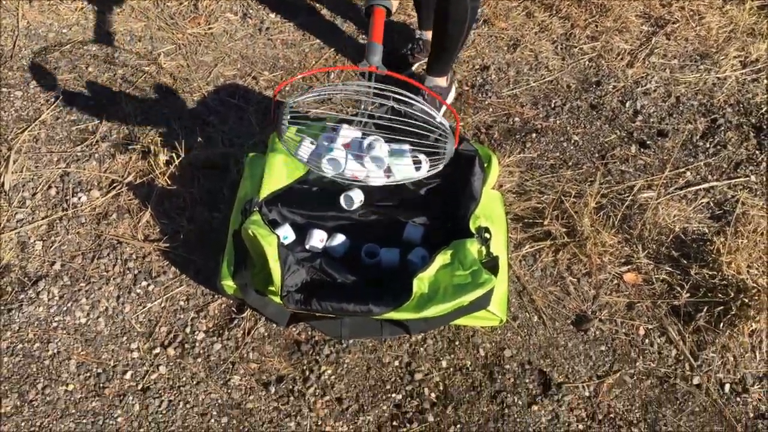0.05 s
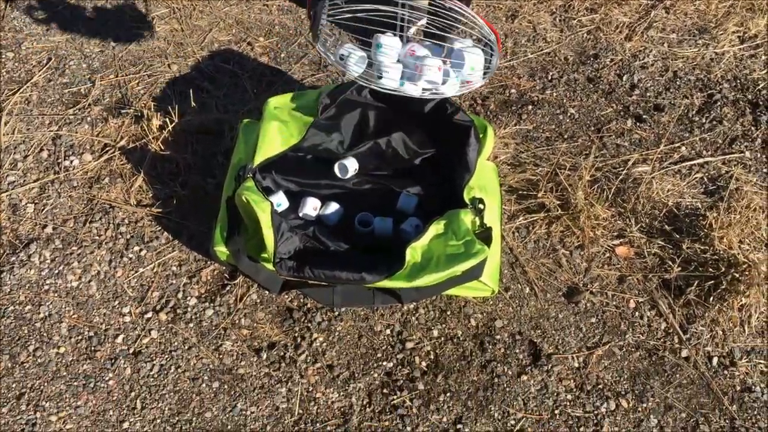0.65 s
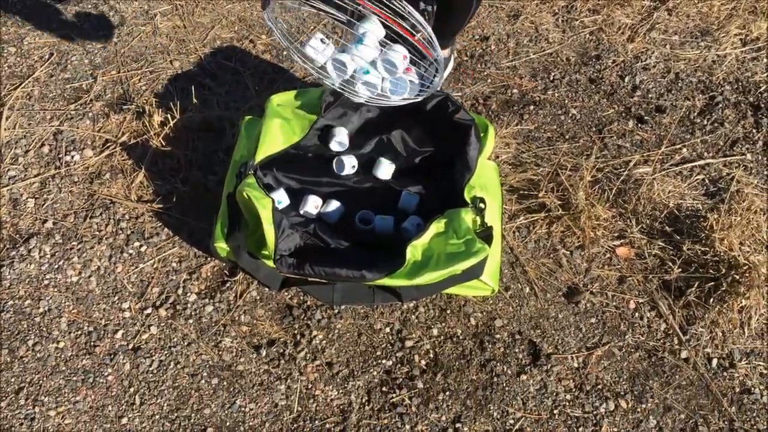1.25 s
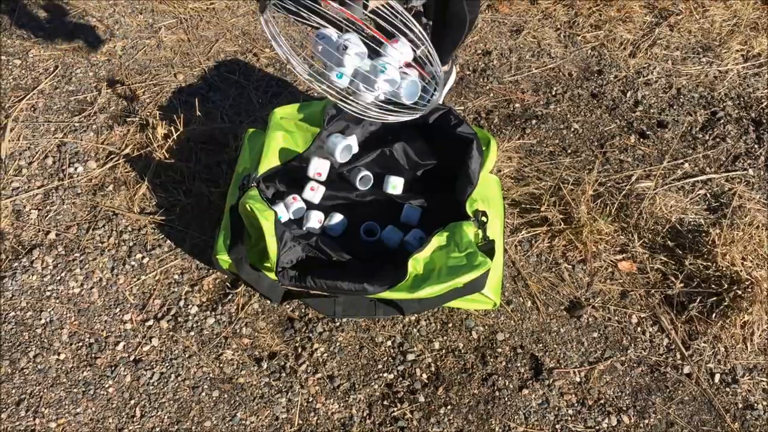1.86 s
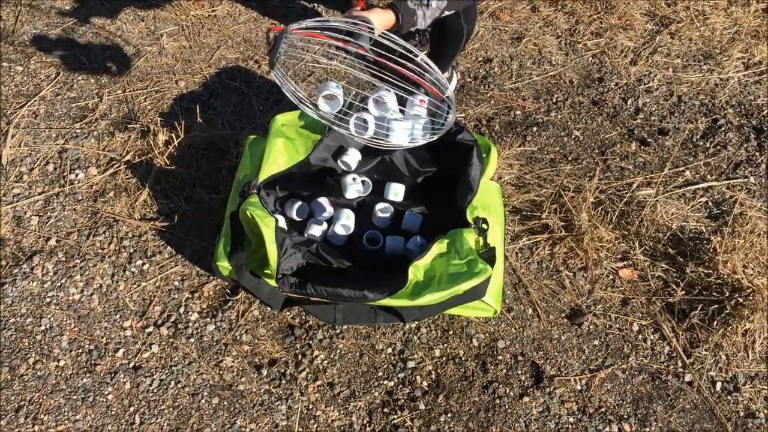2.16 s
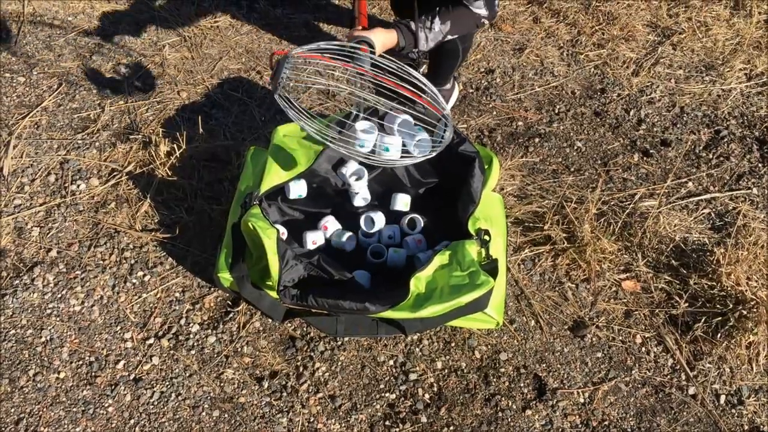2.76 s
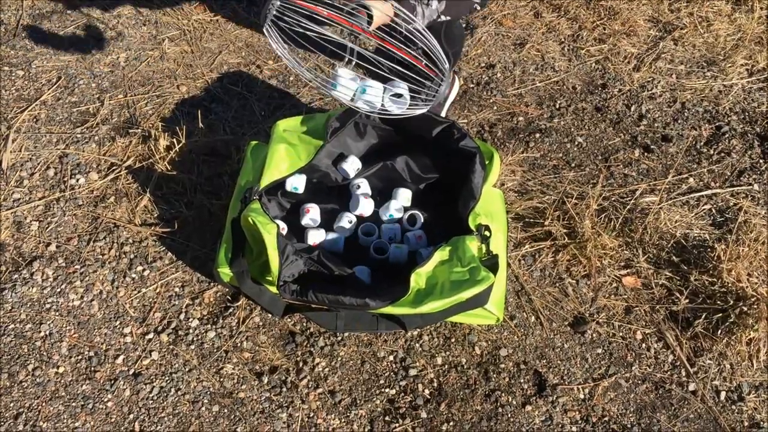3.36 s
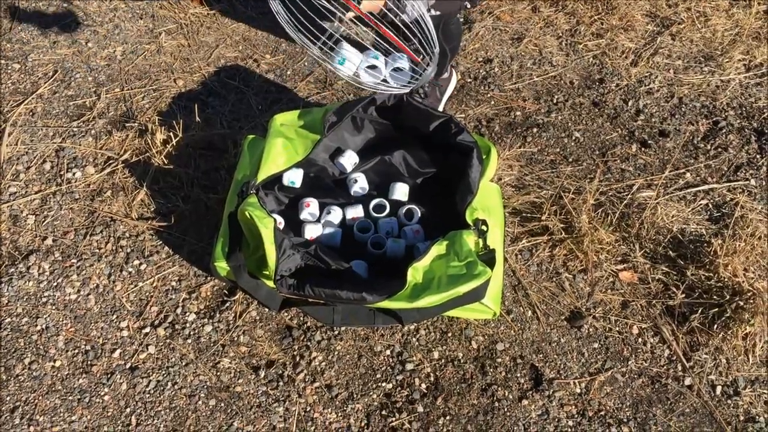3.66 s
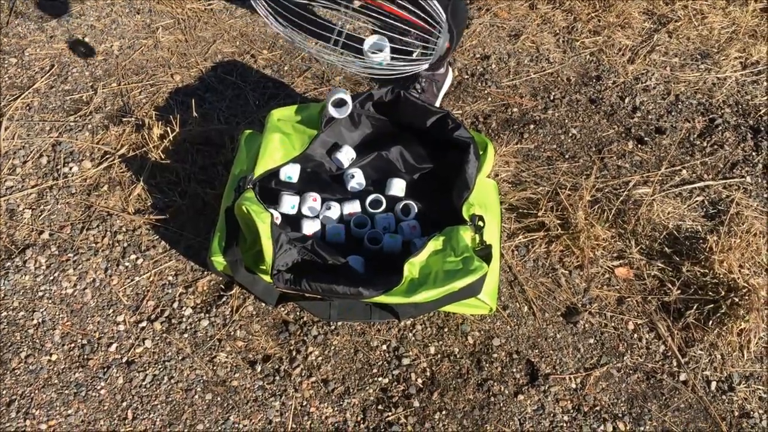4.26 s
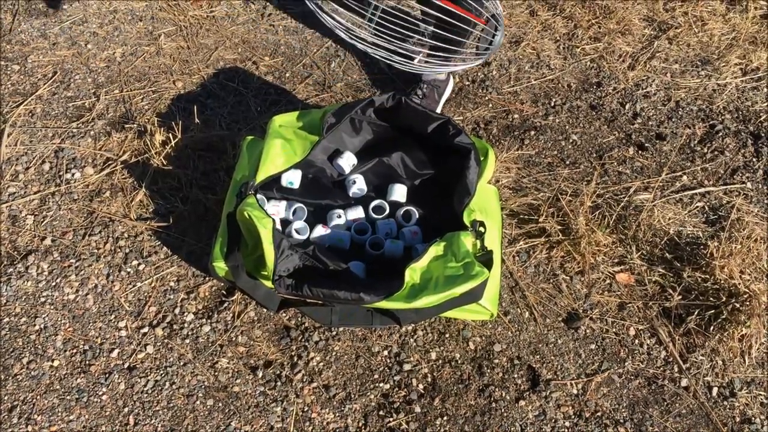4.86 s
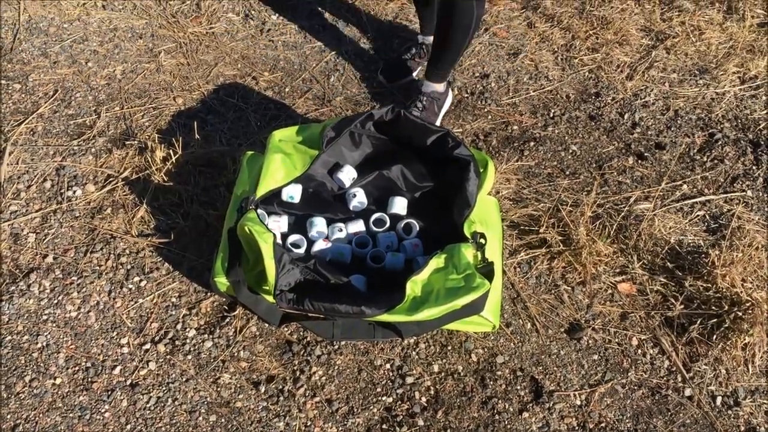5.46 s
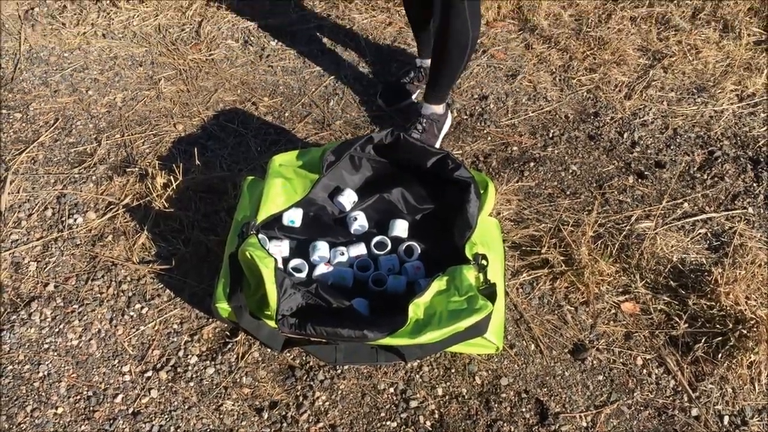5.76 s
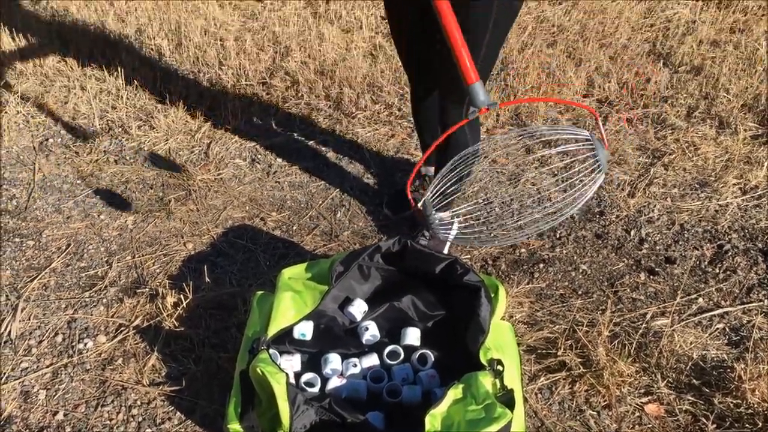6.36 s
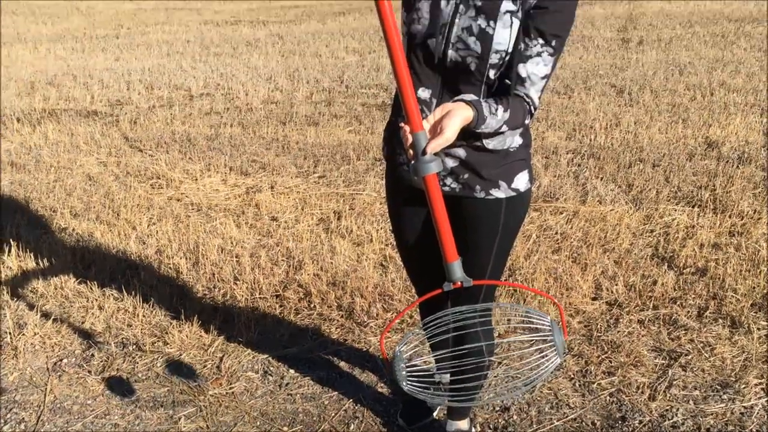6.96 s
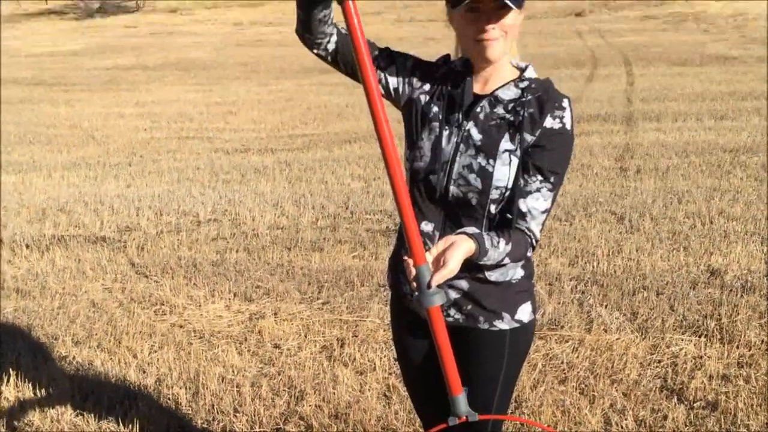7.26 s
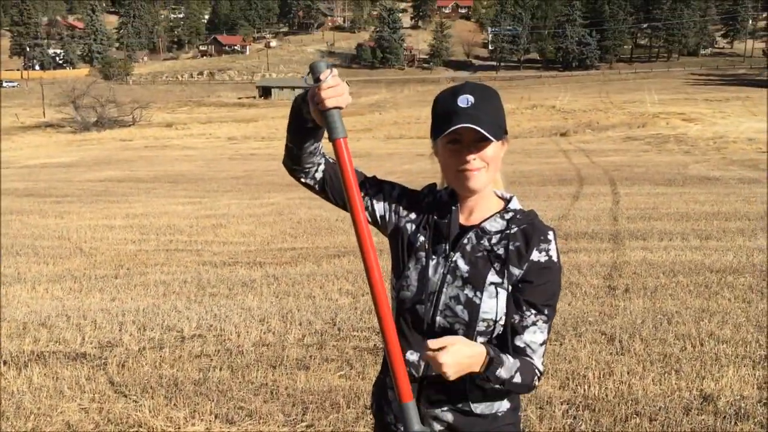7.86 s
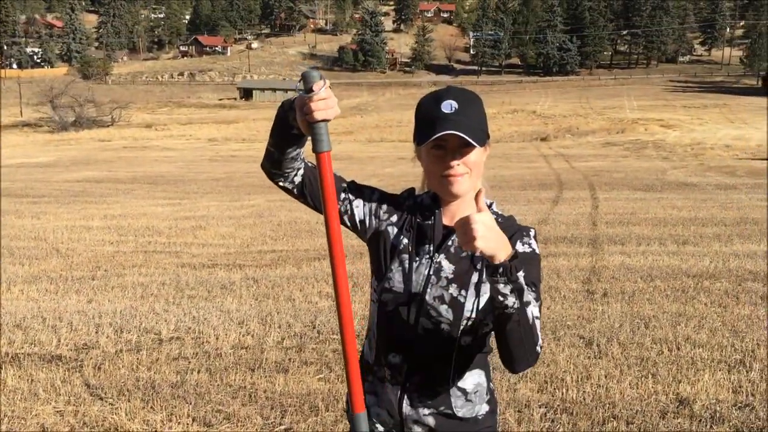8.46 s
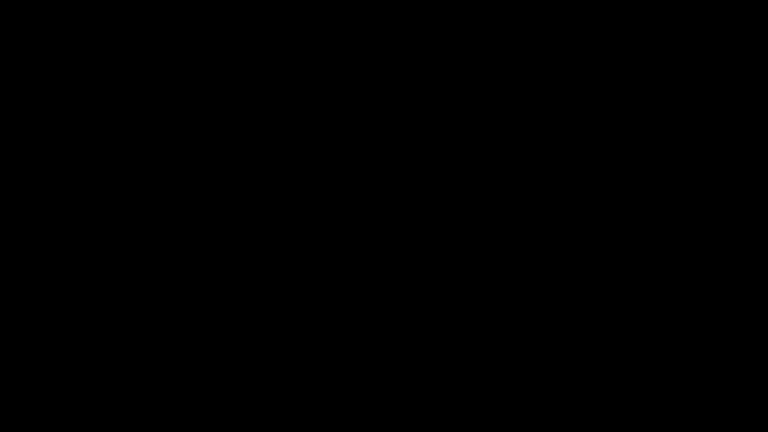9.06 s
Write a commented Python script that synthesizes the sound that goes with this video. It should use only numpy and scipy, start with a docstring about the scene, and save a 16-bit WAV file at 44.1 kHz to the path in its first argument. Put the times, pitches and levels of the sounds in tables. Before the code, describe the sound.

Hollow plastic balls tick and scrape against a wire basket while a faint engine drones far away. They then tumble into a nylon bag in irregular clusters of sharp cracks, hollow clacks and soft thuds. The drone fades, and the heap settles with a brief hiss of cloth. Afterwards shoes and sleeves rustle softly and wind buffets the microphone. The place is an open field without echo.

```python
"""Hollow plastic balls are shaken from a rolling wire basket into a nylon bag, in a field without echo.
At first, over a distant engine's drone, the balls tick and scrape on the wires. From 1.1 s they drop
on the heap: each impact excites damped modes of shell, heap and bag, heard as a crack, a hollow clack
and a thud. The drone fades by 4 s, and near 4.8 s the heap settles with a hiss of friction on cloth.
Then shoes and sleeves rustle, a far hush swells, and turbulent air buffets the microphone until 9 s."""
import sys
import numpy as np
from scipy import signal
from scipy.fft import rfft, irfft, next_fast_len
from scipy.io import wavfile
from scipy.ndimage import uniform_filter1d

SR = 44100
rng = np.random.default_rng(int(sys.argv[2]) if len(sys.argv) > 2 else 0)


def wav_out(sig):
    """Save sig, one row per channel (or a flat mono array), as 16-bit PCM at SR to the path in sys.argv[1]."""
    wavfile.write(sys.argv[1], SR, np.round(np.clip(np.atleast_2d(sig).T, -1, 1) * 32767).astype(np.int16))


N = 401751
HIT = 6615  # samples in one impact, 0.15 s
TIME = np.arange(N) / SR
AGE = TIME[:HIT]


def amp(db):
    """Amplitude ratio of a level in decibels."""
    return 10 ** (np.asarray(db) / 20)


def unit(x):
    """Normalisation to rms 1."""
    return x / np.sqrt(np.mean(x ** 2))


def unit_energy(x):
    """Normalisation to the energy of 10 ms at rms 1."""
    return x / np.sqrt(np.sum(x ** 2) / 441)


def curve(rows):
    """Gain interpolated from rows of t/s, level/dB."""
    return amp(np.interp(TIME, *np.transpose(rows)))


def add(out, s, x):
    """Superposition of a short sound at time s."""
    i = max(int(s * SR), 0)
    out[i:i + len(x)] += x[:max(N - i, 0)]


def swell(start, length, attack, release):
    """Envelope: quadratic rise until the start, a plateau, then exponential decay; times in s."""
    rise = np.clip(1 + (TIME - start) / attack, 0, 1) ** 2
    return rise * np.exp(-np.maximum(TIME - start - length, 0) / release)


def aftermath(blows, t60, delay=0):
    """Energy addition: blows (t/s, level/dB) feed a motion that decays exponentially."""
    energy = np.zeros(N)
    for s, db in blows:
        add(energy, s + delay, amp([db]) ** 2)
    retained = np.exp(-2 * np.log(1000) / (t60 * SR))
    return np.sqrt(signal.lfilter([1], [1, -retained], energy + 1e-24))


def walk(rate):
    """Smooth random modulation of rms 1, with `rate` steps a second."""
    k = int(SR / rate)
    steps = np.repeat(rng.standard_normal(N // k + 1), k)
    return unit(uniform_filter1d(uniform_filter1d(steps, k), k)[:N])


def grains(rate, spread_db):
    """Poisson process of tiny impacts of unequal size."""
    size = amp(spread_db * np.minimum(rng.exponential(size=N), 4))
    return (rng.random(N) < rate / SR) * size * rng.choice([-1, 1], N)


def contact(t60, rise=.0002):
    """Force of a chattering contact: an exponentially decaying noise burst."""
    return rng.standard_normal(HIT) * amp(-60 * AGE / t60) * (1 - np.exp(-AGE / rise))


def bandpass(x, low_hz, high_hz, order=3):
    """Butterworth band limit."""
    return signal.sosfilt(signal.butter(order, [low_hz, high_hz], "band", fs=SR, output="sos"), x)


def colour(x, spectrum, bright_db=0):
    """Minimum-phase filter with the given spectrum; brightness is a shelf above 7 kHz."""
    size = next_fast_len(len(x) + 2048, True)
    size += size % 2
    f = np.maximum(np.fft.rfftfreq(size, 1 / SR), 1)
    hz, db = np.transpose(spectrum)
    shelf = 1 / (1 + (7000 / f) ** 4)
    rolloff_db = 24 * np.clip(np.log2(f / hz[0]), -2, 0)
    gain = amp(np.interp(np.log(f), np.log(hz), db) + rolloff_db + bright_db * shelf)
    cepstrum = irfft(np.log(gain))
    cepstrum[1:size // 2] *= 2  # folding the cepstrum makes the filter causal
    cepstrum[size // 2 + 1:] = 0
    return irfft(rfft(x, size) * np.exp(rfft(cepstrum)))[:len(x)]


def patchy(spectrum, spread_db):
    """Random spectral ripple: each contact point favours its own resonances."""
    hz, db = np.transpose(spectrum)
    fine_hz = np.geomspace(hz[0], hz[-1], 30)
    ripple_db = spread_db * rng.standard_normal(len(fine_hz))
    return np.column_stack([fine_hz, np.interp(np.log(fine_hz), np.log(hz), db) + ripple_db])


def resonate(x, modes, pitch=1, scatter_db=0):
    """Modal superposition: each contact point weights the parallel resonances differently."""
    out = 0
    for (hz, width, db), chance in zip(modes, rng.standard_normal(len(modes))):
        centre = min(hz * pitch, SR * .45)
        b, a = signal.iirpeak(centre, max(centre / width, .5), SR)
        out = out + amp(db + scatter_db * chance) * unit(signal.lfilter(b, a, x))
    return out


# open-air spectrum: f/Hz, level/dB
FIELD = [(30, -26), (65, 4), (130, 2), (200, 0.5), (330, -5.5), (500, -5), (700, -1), (1000, -3.5),
         (1400, -11), (2200, -16.5), (6900, -22.5), (16000, -31)]


def open_air():
    """Ambient noise floor, strongest in the bass, with a slight level modulation."""
    return unit(colour(rng.standard_normal(N), FIELD)) * amp(-63 + .6 * walk(2.7))


# spectrum of the hush: f/Hz, level/dB
HUSH_SPECTRUM = [(400, -20.5), (600, 1.5), (720, 4), (900, -3), (1150, -9.5), (1600, -20), (3000, -36)]
# its envelope: t/s, level/dB
HUSH_LEVEL = [(5.62, -74.5), (5.78, -65.5), (5.9, -78), (6.8, -66.5), (7.02, -63), (7.28, -71.5),
              (7.45, -64.5), (7.85, -66.5), (8.11, -63.5), (8.31, -66.5), (8.47, -62), (8.7, -69.5),
              (8.88, -61.5)]


def far_hush():
    """Slow amplitude modulation makes a band of midrange noise swell and sink."""
    return unit(colour(rng.standard_normal(N), HUSH_SPECTRUM)) * curve(HUSH_LEVEL)


# spectrum of the engine's noise: f/Hz, level/dB
DRONE_SPECTRUM = [(30, -34), (80, -15), (118, 0), (190, -5), (330, -26.5), (440, -27), (560, -9),
                  (690, -8.5), (830, -17), (1100, -13.5), (1500, -28.5), (2400, -30), (4000, -59.5)]
# its envelope: t/s, level/dB
DRONE_LEVEL = [(0, -49.5), (1.1, -47.5), (2.5, -49.5), (3.9, -70.5)]
# partials of the engine's tone: harmonic number, relative level/dB
TONE_HARMONICS = [(1, 0), (2, -18.5)]
# their envelope: t/s, level/dB
TONE_LEVEL = [(0, -46), (.33, -54.5), (.58, -57), (.8, -49.5), (1.15, -58), (2.5, -85)]


def distant_engine(fundamental_hz=119.4, whine_hz=535):
    """A periodic source gives harmonics within broadband noise; a faint whine joins at first."""
    drone = unit(colour(rng.standard_normal(N), DRONE_SPECTRUM))
    drone = drone * amp(1.1 * walk(17)) * curve(DRONE_LEVEL)
    phase_per_hz = 2 * np.pi * np.cumsum(1 + .008 * walk(9)) / SR
    tone = sum(amp(db) * np.sin(k * fundamental_hz * phase_per_hz) for k, db in TONE_HARMONICS)
    whine = amp(-61) * np.sin(whine_hz * phase_per_hz) * swell(0, .32, attack=.05, release=.055)
    return drone + np.sqrt(2) * (tone * curve(TONE_LEVEL) + whine)


# spectrum of wind pressure: f/Hz, level/dB
WIND_SPECTRUM = [(20, -26.5), (35, -9), (55, 3.5), (90, -6.5), (160, -16), (300, -32.5), (700, -67.5)]
# gusts: t/s, duration/s, level/dB
GUSTS = [(0, 3.7, -59.5), (1.097, 0.079, -41), (3.114, 0.15, -44), (3.336, 0.4, -42), (3.85, 0.092, -51.5),
         (6.443, 0.44, -45.5), (7.13, 0.026, -41.5), (7.404, 0.203, -47), (7.731, 0.18, -46),
         (8.0, 0.6, -50.5), (8.557, 0.52, -42)]
# sudden buffets of air: t/s, level/dB, f/Hz
BUFFETS = [(8.572, -26, 62.2), (8.611, -26, 75.6), (8.796, -24, 210), (8.890, -22.5, 90),
           (8.917, -18, 111.6), (8.941, -24, 69.9)]


def breeze(calm_db=-71.5):
    """Turbulence rumbles on the microphone; the strongest eddies are single swings of pressure."""
    eddies = amp(3.2 * walk(14))
    gusts = [amp(db) * swell(s, length, attack=.051, release=.024) for s, length, db in GUSTS]
    strength = np.hypot(np.max(gusts, axis=0), amp(calm_db))
    out = unit(colour(rng.standard_normal(N), WIND_SPECTRUM) * eddies) * strength
    for s, db, hz in BUFFETS:
        phase = 2 * np.pi * hz * (TIME - s)
        out -= amp(db) * np.sin(phase) * np.exp(-(phase / 2.46) ** 2)
    return out


# scuffs: t/s, duration/s, level/dB, lower f/Hz, upper f/Hz
RUSTLES = [(0.482, 0.071, -49.5, 3330, 12400), (6.456, 0.048, -45.5, 101, 180),
           (6.458, 0.031, -43, 545, 1304), (6.541, 0.028, -47.5, 500, 1240), (6.55, 0.32, -57.5, 523, 1054),
           (7.194, 0.32, -73.5, 4690, 6520), (7.891, 0.059, -62, 5900, 16250),
           (7.911, 0.013, -58, 3230, 3700)]


def rustles():
    """Friction of shoes, sleeves and handle: dense tiny slips merge into bands of noise."""
    out = np.zeros(N)
    for s, length, db, low_hz, high_hz in RUSTLES:
        rub = bandpass(grains(rate=8500, spread_db=1.5), low_hz, high_hz, order=2)
        out += amp(db) * unit(rub) / (1 + (2 * (TIME - s) / length) ** 4)
    return out


# single balls rolling down the side of the bag: t/s, duration/s, level/dB
ROLLS = [(1.335, 0.083, -48.5), (1.74, 0.045, -38), (2.3, 0.17, -40), (2.55, 0.23, -40.5),
         (2.96, 0.07, -42), (3.557, 0.17, -50.5)]


def heap_motion(settle_s=4.785, fall_db_per_s=31):
    """Envelopes of tumbling and sliding: landings, rolls and the last settling add in power."""
    thuds = [(s, thud_db) for s, thud_db, *_ in KNOCKS]
    tumbling = amp(-20) * aftermath(thuds, t60=.85, delay=.011)
    for s, length, db in ROLLS:
        tumbling = np.hypot(tumbling, amp(db) * swell(s, length, attack=.0205, release=.02))
    settling = swell(settle_s, .21, attack=.035, release=.015)
    settling *= amp(-fall_db_per_s * np.maximum(TIME - settle_s, 0))
    return np.hypot(tumbling, amp(-44.5) * settling), amp(-37.5) * settling


# modes of the bag and of the heap in it: f/Hz, bandwidth/Hz, level/dB
BAG_MODES = [(119.7, 50, -15), (185, 110, 4), (262, 110, 3.5), (398.7, 57, 5.5)]
HEAP_MODES = [(630, 280, -16), (698, 80, 3.5), (930, 390, 5.5), (1100, 170, -5)]
# spectrum of rubbed nylon: f/Hz, level/dB
NYLON_SPECTRUM = [(500, -7), (1000, -16), (1900, 4.5), (2300, -9.5), (3100, 6), (4900, -6), (7900, -2.5),
                  (16000, -2)]


def bag():
    """Soft random impacts excite the modes of bag and heap; sliding friction makes the nylon hiss."""
    bumps = grains(rate=75, spread_db=3)
    nudges = grains(rate=90, spread_db=3)
    body = resonate(bumps, BAG_MODES) + amp(-4.5) * resonate(bumps + nudges, HEAP_MODES)
    tumble = unit(bandpass(body, 120, 1300))
    hiss = colour(grains(rate=1800, spread_db=.5), NYLON_SPECTRUM) * amp(1.5 * walk(60))
    # comb filtering: a close reflection whose path grows makes the hiss zing downwards
    lag_s = np.interp(TIME, [4.78, 5.0], [.00125, .00145])
    hiss = unit(hiss + amp(-10) * np.interp(TIME - lag_s, TIME, hiss))
    tumbling, sliding = heap_motion()
    return tumble * tumbling + hiss * sliding


def cage(touch, ring_db=-12):
    """Convolution with a decaying impulse response: the many wires ring briefly after a touch."""
    tail = contact(t60=.055, rise=.0046)
    tail /= np.sqrt(np.sum(tail ** 2))
    return touch + amp(ring_db) * signal.fftconvolve(touch, tail)[:len(touch)]


# the load shifts as the basket is shaken: t/s, duration/s, relative levels of chatter/dB, hollow ring/dB
SHIFTS = [(0.133, 0.14, -55.5, -48.5), (0.462, 0.11, -39.5, -64), (0.595, 0.33, -42.5, -41),
          (1.11, 0.15, -39.5, -41.5), (1.294, 0.24, -45, -42), (1.583, 0.11, -38, -40),
          (1.763, 0.16, -41, -39), (1.826, 0.033, -26.5, -31.5), (2.029, 0.091, -34, -34.5),
          (2.178, 0.26, -37, -39), (2.488, 0.135, -38.5, -33), (2.668, 0.12, -39, -42.5),
          (2.808, 0.07, -50.5, -57), (2.911, 0.11, -41.5, -41), (3.438, 0.037, -47.5, -42.5),
          (3.538, .04, -42.5, -51), (3.619, 0.067, -49, -47.5), (3.834, 0.11, -64.5, -62),
          (4.014, 0.14, -56, -64)]


def basket_motion(attack=.018, release=.011):
    """Envelopes of wire chatter and hollow ring: stirring, shivers and shifts add in power."""
    stir = amp(-64.5) * swell(.091, 3.56, attack, release)  # while the basket holds a load
    cracks = [(s, crack_db) for s, *_, crack_db, _ in KNOCKS]
    shiver = aftermath(cracks, t60=.66)
    chatter = np.hypot(stir, amp(-34) * shiver)
    hollow = np.hypot(stir, amp(-33.5) * shiver)
    for s, length, chatter_db, hollow_db in SHIFTS:
        shift = swell(s, length, attack, release)
        chatter = np.hypot(chatter, amp(chatter_db) * shift)
        hollow = np.hypot(hollow, amp(hollow_db) * shift)
    return chatter, hollow


# low modes and higher bending modes of a ball's shell: f/Hz, bandwidth/Hz, level/dB
SHELL_MODES = [(1886.6, 70, -1.5), (1730, 390, -6), (1293, 810, -5.5)]
OVERTONES = [(2780, 90, -4), (3860, 170, -2), (4350, 70, -6), (6250, 79, 3), (7300, 110, -1), (9560, 82, 5),
             (11124, 130, 1)]
# spectrum of a touched wire: f/Hz, level/dB
WIRE_SPECTRUM = [(1700, -30.5), (2300, -6.5), (2600, -2.5), (3400, 6), (4900, -4), (6100, 3.5), (7400, -6),
                 (9200, -3), (10300, -13.5), (11400, -0.5), (13500, -13), (16000, -14)]
# contact spots in the load: shell frequency ratio, brightness/dB
SPOTS = [(.975, -9), (.99, -3), (1, 0.5), (1.01, 4), (1.02, 6), (1.035, 10.5)]


def jostle():
    """Stick-slip friction: balls catch and scrape on the wires, and the cage blends it into a jingle."""
    chatter, hollow = basket_motion()
    rate = 95 * np.clip(chatter / amp(-39), .7, 2)  # catches per second at each spot
    retained = np.exp(-1 / (.0016 * SR))
    out = np.zeros(N)
    for pitch, bright_db in SPOTS:
        catches = grains(rate, spread_db=4) / np.sqrt(rate)
        # every catch is followed by a short scrape, over a faint steady slip
        grip = unit(np.sqrt(signal.lfilter([1], [1, -retained], catches ** 2) + 1e-12))
        scrape = (grip + amp(-16)) * rng.standard_normal(N)
        touch = unit(scrape) + amp(-16) * unit(resonate(scrape, OVERTONES, pitch, scatter_db=3))
        wires = colour(cage(touch), patchy(WIRE_SPECTRUM, spread_db=3), bright_db)
        shell = bandpass(resonate(scrape, SHELL_MODES, pitch, scatter_db=3), 680, 2600)
        out += amp(-9) * unit(wires) * chatter + amp(-10) * unit(shell) * hollow
    return out


# light contacts in the basket: t/s, hollow ring level/dB, tick level/dB, relative brightness/dB
TICKS = [(0.12, -36, -52, -11), (0.145, -48, -46.5, -12), (0.189, -42.5, -56, -19), (0.246, -46, -39.5, -4),
         (0.503, -29, -30.5, -7), (0.553, -32, -32, -8), (0.566, -37.5, -36, -18), (0.658, -39, -51, -14),
         (0.694, -34, -37.5, -8), (0.736, -35, -35.5, -3), (0.771, -36, -28.5, 1), (0.807, -45, -35, 9),
         (0.869, -36.5, -36, -14), (0.942, -52, -41, 5), (1.089, -59, -40, -4), (1.179, -33, -31.5, 8),
         (1.472, -48, -36, -1), (1.565, -34, -31.5, -2), (1.606, -35, -30, 2), (1.842, -31, -25, 13),
         (1.847, -30, -30, 7), (1.903, -61, -44, 13), (2.012, -50, -31, 13), (2.036, -52, -28, 15),
         (2.14, -35, -29, -4), (2.387, -43, -25.5, 15), (2.414, -50, -33, 12), (2.56, -44, -28, 2),
         (2.659, -37.5, -33, 4), (2.696, -35, -31.5, -5), (2.727, -33, -30, 3), (2.851, -36, -37, -4),
         (3.208, -38, -44, 0), (3.349, -43, -47.5, 4), (3.42, -54, -38, 0), (3.466, -37, -39, 0),
         (3.835, -73, -47, -1), (3.85, -66.5, -47, 4), (3.865, -75, -41, 20), (3.952, -46, -42, -4),
         (4.003, -43.5, -46, -1), (4.024, -40, -30, 28), (4.028, -44, -23, 9), (4.03, -33.5, -27.5, -4),
         (4.067, -68, -38.5, 7), (4.094, -60, -37.5, 3), (4.145, -56, -38, 3), (4.214, -64, -46, 8),
         (4.242, -68.5, -39.5, 7), (4.439, -36.5, -37, -11), (4.594, -41, -45, 2), (4.727, -36, -35, 11.5),
         (4.983, -43, -36.5, -15), (5.569, -63, -63, -18), (5.94, -69, -60, -5), (6.092, -78, -61.5, -2.5)]


def ticks():
    """Impulse excitation: a ball brushing a wire sets off a tick in the cage and a note in its shell."""
    out = np.zeros(N)
    for s, ring_db, tick_db, bright_db in TICKS:
        tap = contact(t60=.013, rise=.0005)
        overtones = resonate(contact(t60=.003817), OVERTONES, rng.normal(1, .099), scatter_db=4)
        overtones *= amp(-60 * AGE / .075)
        touch = unit_energy(tap) + amp(-13) * unit_energy(overtones)
        tick = colour(cage(touch), patchy(WIRE_SPECTRUM, spread_db=1.8), bright_db + 5.5)
        push = contact(t60=.012) + amp(-14) * contact(t60=.055)
        shell = resonate(push, SHELL_MODES, rng.normal(1, .018), scatter_db=2.5)
        add(out, s, amp(tick_db) * unit_energy(tick))
        add(out, s, amp(ring_db) * unit_energy(bandpass(shell, 460, 2400)))
    return out


# modes of a free ball: frequency ratio, T60/s, level/dB
FREE_MODES = [(1, .1, 0), (2.78, .16, -16.5), (4.55, .1, -25)]
# balls bouncing clear: t/s, level/dB, f/Hz, overtone gain/dB
FREE_RINGS = [(1.126, -35, 1546, -11), (1.727, -23, 1568, -2), (2.302, -22.5, 1572, 5.5),
              (2.329, -17, 1577, 0.5), (2.485, -29.5, 1540, -13.5), (2.56, -24.5, 1572, -11.5),
              (5.574, -54, 1910, -11.5)]


def free_rings():
    """Damped free vibration: a ball sings for a tenth of a second, its phase wobbling as it spins."""
    out = np.zeros(N)
    for s, db, hz, overtone_db in FREE_RINGS:
        wobble = np.cumsum(rng.standard_normal(HIT)) * .025
        ring = np.zeros(HIT)
        for ratio, t60, mode_db in FREE_MODES:
            decay = amp(mode_db + overtone_db * (ratio > 1) - 60 * AGE / t60)
            ring += decay * np.sin(2 * np.pi * hz * ratio * AGE + wobble)
        onset = 1 - np.exp(-AGE / .0034)
        add(out, s, amp(db) * unit_energy(ring * onset))
    return out


# spectrum of colliding shells: f/Hz, level/dB
CRACK_SPECTRUM = [(1700, -29.5), (2400, -9.5), (3000, -3.5), (3700, 2.5), (4300, -6), (5000, -9.5),
                  (6300, -7), (8200, -10), (10300, -14.5), (11500, -7), (14300, -14.5), (15500, -11.5)]
# balls landing or knocking together: t/s, thud level/dB, clack level/dB, clack f/Hz,
# shell ring level/dB, ring f/Hz, crack level/dB, relative brightness/dB
KNOCKS = [(1.124, -17, -18, 624, -22, 1570, -26, -5), (1.161, -36, -34, 610, -27.5, 1950, -29.5, -6),
          (1.212, -33, -42, 1140, -37, 1320, -28.5, 0), (1.223, -37, -24.5, 670, -26, 1380, -25.5, -15),
          (1.505, -31.5, -25, 640, -27.5, 1630, -28, -8), (1.634, -28, -32, 650, -45, 1270, -38, -9),
          (1.716, -34.5, -31.5, 984, -31.5, 1930, -29.5, -20),
          (1.724, -25, -26, 700, -25.5, 1570, -18.5, 1.5), (1.745, -29, -32, 620, -36, 1550, -42, -10),
          (1.931, -20, -19, 663, -22, 1750, -19.5, -1), (1.973, -49.5, -37, 1240, -18, 1840, -13.5, 2),
          (1.981, -27.5, -26.5, 700, -37, 1300, -14.5, -5),
          (1.983, -30.5, -28.5, 690, -15, 1413, -15.5, -9.5),
          (2.054, -47, -38.5, 1050, -31.5, 1830, -21.5, -1.5), (2.07, -25, -21, 706, -24, 1760, -15.5, -11),
          (2.079, -28, -38, 530, -23, 1530, -24.5, -2.5), (2.093, -35.5, -36, 1000, -30, 1820, -30, -5),
          (2.167, -45.5, -32, 1080, -26.5, 1800, -17, 4), (2.227, -31, -35.5, 701.5, -30, 2070, -22, -15.5),
          (2.25, -24.5, -28.5, 695, -44, 1620, -32, -2.5),
          (2.265, -24.5, -21, 700, -27.5, 1700, -20.5, 0.5), (2.278, -28, -28, 1060, -16, 1384, -18, -13.5),
          (2.288, -29.5, -33, 667, -43.5, 1870, -21, -4), (2.308, -46, -28, 790, -22, 1460, -24, -8),
          (2.511, -28, -23, 710, -23, 1935, -23, 2), (2.518, -26, -28, 755, -22.5, 1940, -20, -10.5),
          (2.534, -29.5, -27.5, 714, -21, 1320, -22.5, -24),
          (2.584, -31.5, -32, 1010, -25, 1500, -20.5, -10), (2.595, -35, -28.5, 940, -27, 1800, -24.5, 2),
          (2.603, -27.5, -31.5, 1180, -38, 1300, -32.5, -14),
          (2.767, -33, -22.5, 720, -21, 1910, -19, -1.5), (2.772, -21, -25.5, 693, -31.5, 1850, -24, -8),
          (2.95, -23, -23, 934, -22, 1490, -16.5, 2), (2.975, -39.5, -35.5, 1224, -31, 1510, -33.5, -25.5),
          (3.004, -30.5, -31, 701.5, -28.5, 1360, -33.5, -8.5),
          (3.034, -44, -38.5, 1230, -26.5, 1630, -44, -11.5),
          (3.042, -29.5, -30.5, 730, -17.5, 1380, -16.5, -34),
          (3.078, -57, -42, 1180, -30, 1660, -40, -10.5), (3.151, -20.5, -21, 996, -18.5, 1904, -17, -5),
          (3.163, -31.5, -29.5, 960, -28, 1900, -34.5, -6),
          (3.183, -41.5, -48.5, 553, -33.5, 1450, -53.5, 0),
          (3.373, -24.5, -19.5, 1270, -18.5, 1460, -19, -16),
          (3.594, -35, -38.5, 700, -38.5, 1960, -32, -5), (3.646, -40.5, -37.5, 1150, -36, 1560, -36, -14),
          (4.311, -23.5, -17, 720, -23, 1800, -14.5, -3.5), (4.415, -35, -45, 793, -37, 1550, -42, -15.5),
          (4.499, -22.5, -24.5, 1218, -31.5, 1890, -12.5, -6.5),
          (4.502, -21, -21, 1219, -19.5, 1900, -20, -8.5), (4.573, -38, -38, 600, -47.5, 1220, -50.5, -12),
          (4.603, -37, -43, 560, -44.5, 1970, -34, -8), (4.64, -20, -19.5, 1270, -18, 1546, -17.5, -12.5),
          (4.735, -40, -41, 950, -27, 1910, -29, -4), (4.748, -27.5, -32, 536, -51, 1950, -45, -11),
          (4.763, -31.5, -38, 570, -37, 1230, -46, -11), (5.569, -59, -66.5, 1050, -52, 1750, -62, -26)]


def knocks():
    """Impact excitation: short contacts crack and ring the shells; longer ones drive heap and bag."""
    out = np.zeros(N)
    for s, thud_db, clack_db, clack_hz, ring_db, ring_hz, crack_db, bright_db in KNOCKS:
        overtones = resonate(contact(t60=.0017), OVERTONES, rng.normal(1, .062), scatter_db=4.5)
        snap = contact(t60=.0099, rise=.00066) + amp(-21) * contact(t60=.066)
        strike = unit_energy(snap) + amp(-6.5) * unit_energy(overtones)
        crack = colour(strike, patchy(CRACK_SPECTRUM, spread_db=2), bright_db + 5.5)
        # the struck shell rings at its own pitch, its neighbours more faintly
        push = contact(t60=.013) + amp(-17) * contact(t60=.06)
        shell = resonate(push, [(ring_hz, 85, 0), (1350, 260, -8), (1930, 110, -7)], scatter_db=3.5)
        # where the ball lands decides which note of the heap and of the bag stands out
        shove = contact(t60=.028) + amp(-18.5) * contact(t60=.1)
        heap = resonate(shove, HEAP_MODES, rng.normal(1, .05), scatter_db=4)
        clack = unit(heap) + resonate(shove, [(clack_hz, 100, 1)])
        # the cloth gives way, so the lows come a moment later
        sag = contact(t60=.026, rise=.0026)
        thud = resonate(sag, BAG_MODES, rng.normal(1, .029), scatter_db=1.5)
        add(out, s, amp(crack_db) * unit_energy(crack))
        add(out, s, amp(ring_db) * unit_energy(bandpass(shell, 630, 2000)))
        add(out, s, amp(clack_db) * unit_energy(bandpass(clack, 450, 1350)))
        add(out, s, amp(thud_db) * unit_energy(bandpass(thud, 120, 470)))
    return out


def scene():
    """Free-field superposition: the sources add without echo and fade out at 9 s."""
    balls = knocks() + free_rings() + ticks() + jostle() + bag()
    background = rustles() + breeze() + open_air() + distant_engine() + far_hush()
    fade = np.clip(1 - (TIME - 8.99) / .029, amp(-40), 1)
    return (fade * (background + balls))[None]


def record(dry):
    """Soft saturation rounds the loudest peaks; a steep low-pass cuts above 16 kHz."""
    rounded = dry / (1 + (dry / .95) ** 6) ** (1 / 6)
    return signal.sosfilt(signal.ellip(10, .2, 80, 16000, fs=SR, output="sos"), rounded)


dry = scene()
out = record(dry)
wav_out(out)
```